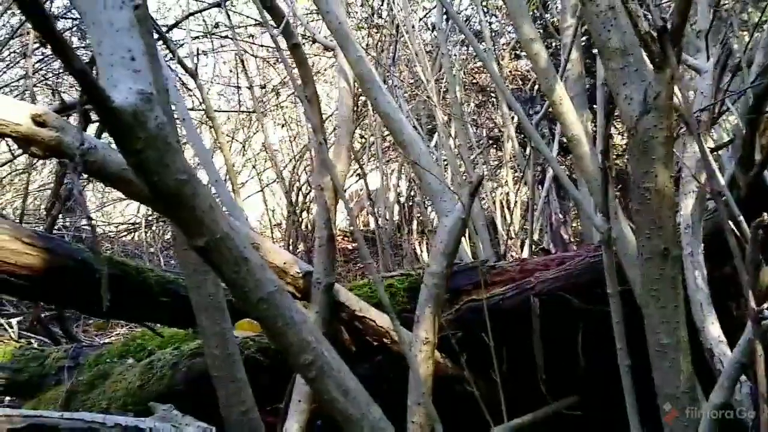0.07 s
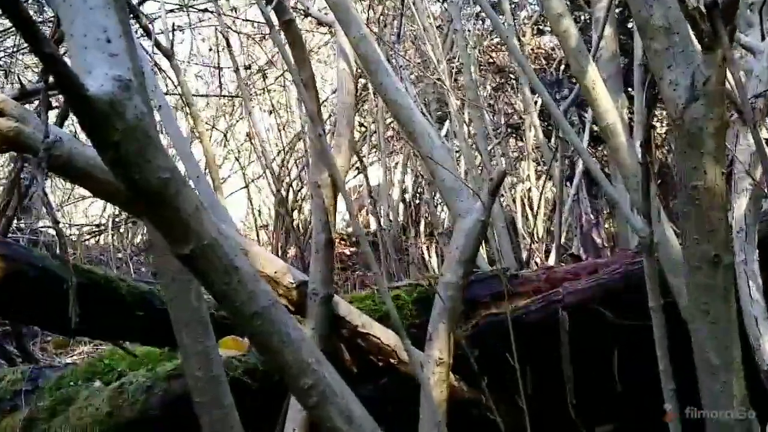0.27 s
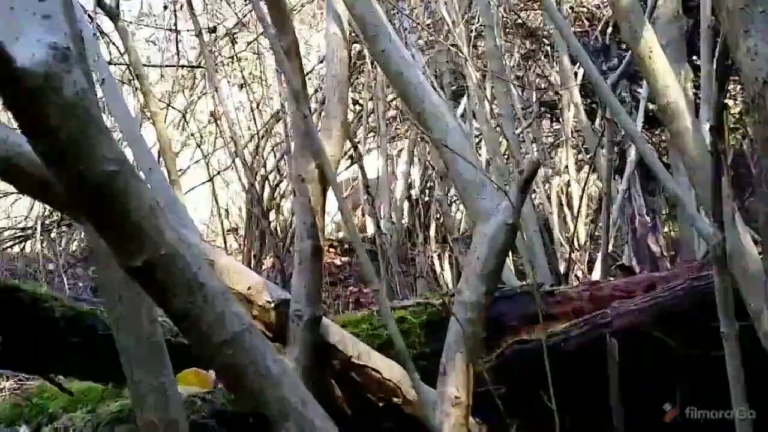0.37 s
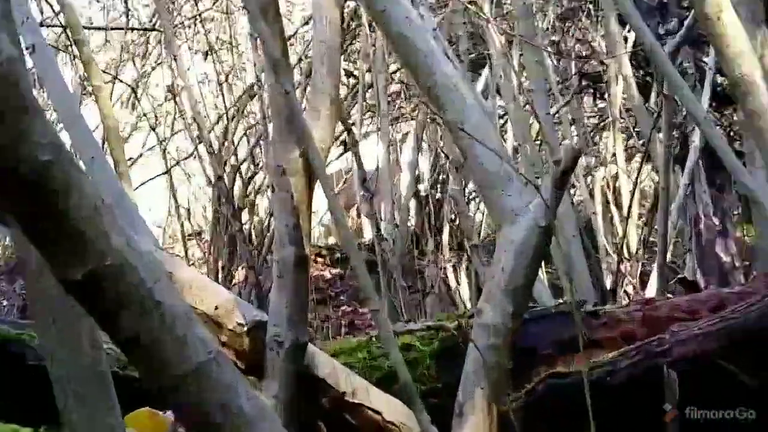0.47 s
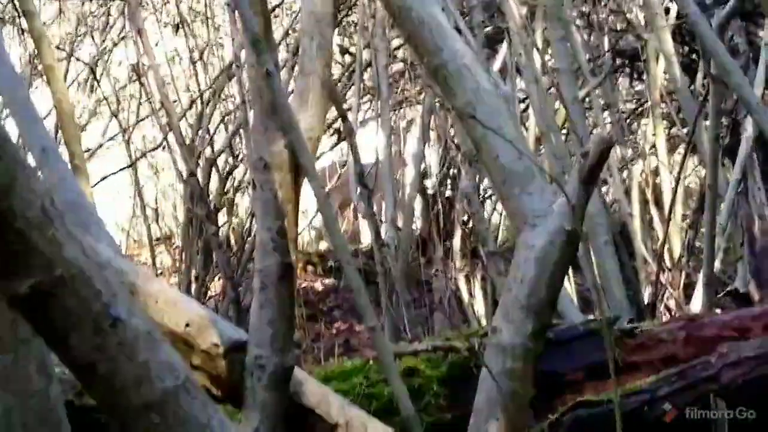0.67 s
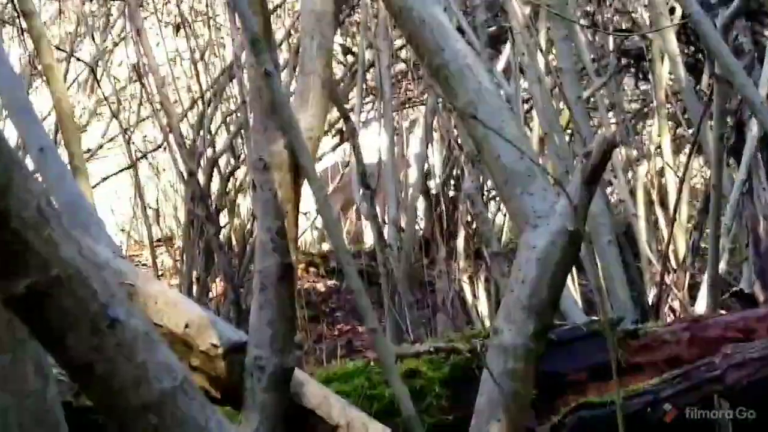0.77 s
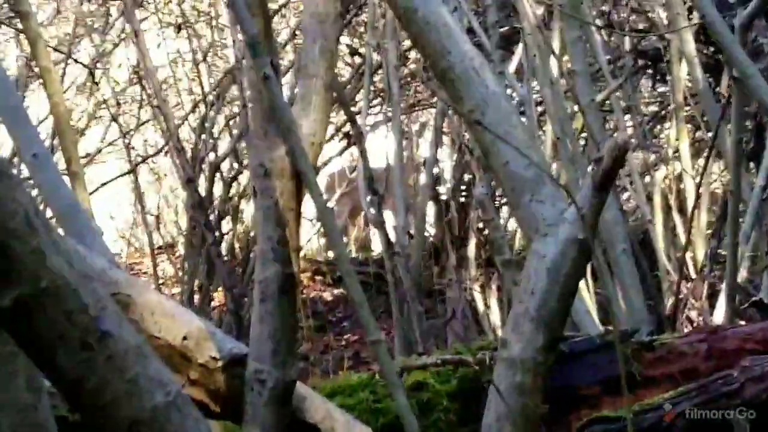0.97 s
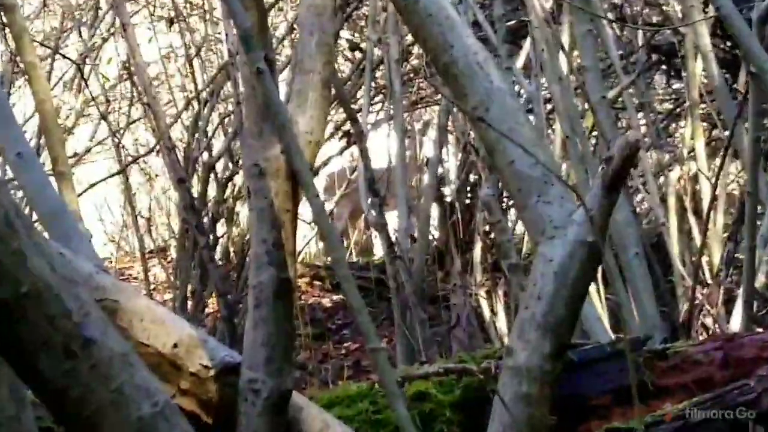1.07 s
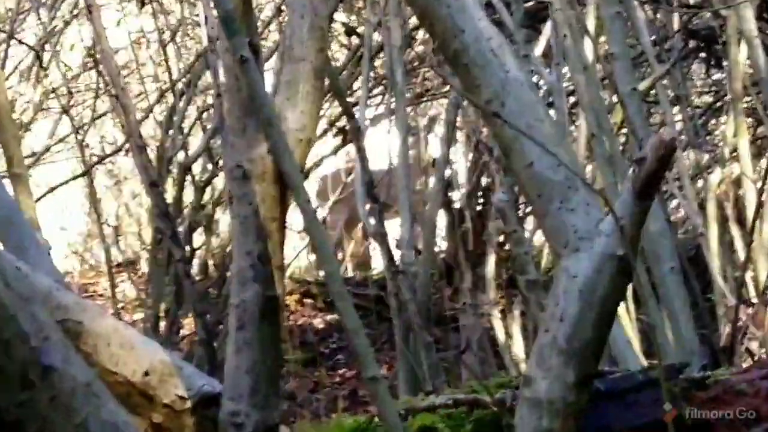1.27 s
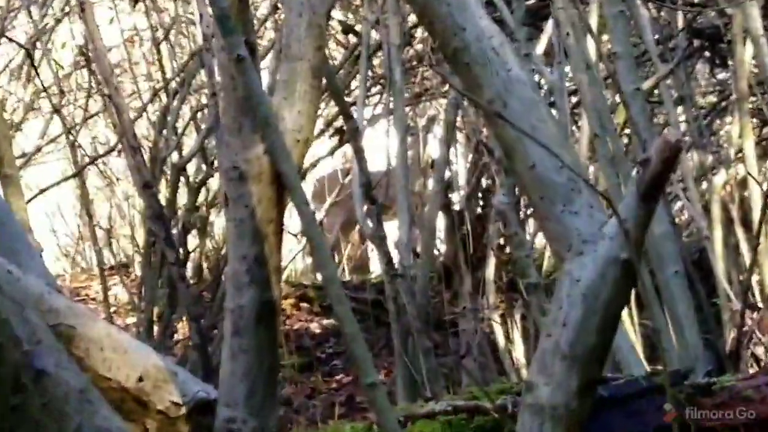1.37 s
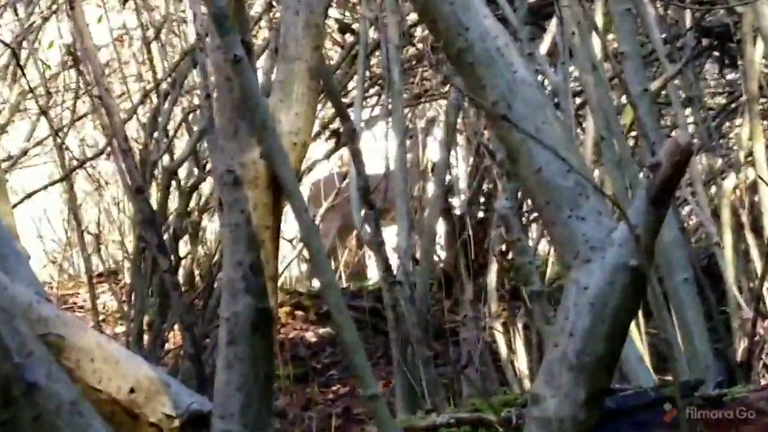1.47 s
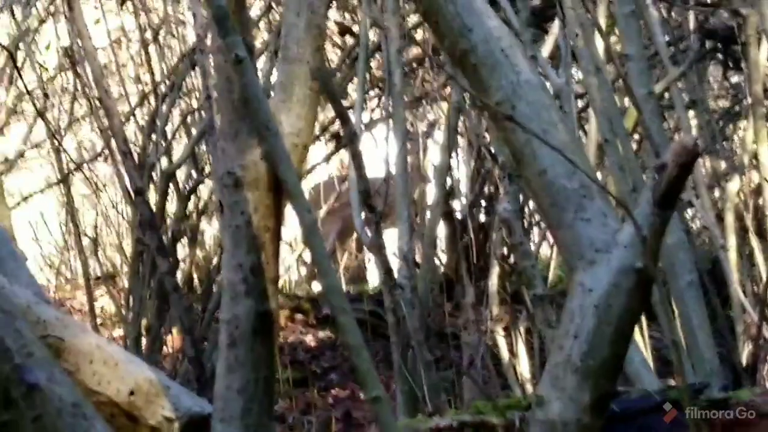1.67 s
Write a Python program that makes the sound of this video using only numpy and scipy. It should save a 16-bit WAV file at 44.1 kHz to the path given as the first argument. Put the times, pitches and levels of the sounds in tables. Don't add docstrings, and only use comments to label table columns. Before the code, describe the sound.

Dry debris snaps and crunches close on the right after a bright leaf rustle, in quiet woods

```python
import sys
import numpy as np
from scipy import signal
from scipy.fft import rfft, irfft
from scipy.io import wavfile
from scipy.ndimage import uniform_filter1d

SR = 44100
rng = np.random.default_rng(int(sys.argv[2]) if len(sys.argv) > 2 else 0)


def to_wav(sig):
    pcm = np.clip(np.atleast_2d(sig), -1, 1) * 32767
    pcm = np.round(pcm).astype(np.int16)
    wavfile.write(sys.argv[1], SR, pcm.T)


def voltage_ratio(level):
    return 10 ** (np.asarray(level, float) / 20)


N = 77175
CUT_S, BACK_S = 0.5116, 0.569


def read(points, hz):
    f, value = np.transpose(points)
    return np.interp(np.log(hz + 1), np.log(f + 1), value)


def curve(table, column):
    rows = np.array(table)
    return np.interp(np.arange(N) / SR, rows[:, 0], rows[:, column])


def evened(x):
    return x / np.sqrt(np.mean(x ** 2) + 1e-20)


def add(mix, start_s, sound):
    part = mix[..., round(start_s * SR):][..., :sound.shape[-1]]
    part += sound[..., :part.shape[-1]]


def colour(x, points, tilt_db=0):
    size = x.shape[-1]
    hz = np.fft.rfftfreq(size, 1 / SR)
    gain_db = read(points, hz) + tilt_db * np.log10((hz + 50) / 1000)
    return evened(irfft(rfft(x) * voltage_ratio(gain_db), size))


def resonate(x, hz, width_hz):
    carrier = np.exp(2j * np.pi * np.cumsum(hz * np.ones(len(x))) / SR)
    pole = np.exp(-np.pi * width_hz / SR)
    slow = signal.lfilter([1], [1, -2 * pole, pole * pole], x / carrier)
    return evened((carrier * slow).real)


def gritty(size, spread_db=2.0):
    grains_per_s, bed_gain = 9000, 0.7
    hit = rng.random(size) < grains_per_s / SR
    strength = voltage_ratio(spread_db * np.minimum(rng.exponential(1, size), 3))
    grains = evened(hit * strength * rng.standard_normal(size))
    return grains + bed_gain * rng.standard_normal(size)


def patchy(x, depth_db):
    z = signal.stft(x, nperseg=256)[2]
    field = rng.standard_normal(z.shape[1:])
    field = uniform_filter1d(field, size=6, axis=0)
    field = evened(uniform_filter1d(field, size=4, axis=1))
    patched = signal.istft(z * voltage_ratio(depth_db * field), nperseg=256)[1]
    return evened(patched[:, :x.shape[-1]])


# (frequency [Hz], density [dB per Hz])
AIR_SPECTRUM = [(150, -30), (250, -2.5), (512, -23.5), (804, -25.5), (1240, -26.5), (4200, -30),
                (13500, -37)]


def air():
    level_db = -74.5
    return voltage_ratio(level_db) * np.array([colour(x, AIR_SPECTRUM) for x in rng.standard_normal((2, N))])


# (time [s], level [dB rms], share in the hum [0-1])
RUMBLE = [(0, -69, 0.12), (.5, -61.5, 0.094), (.66, -61.5, 0.39), (.81, -52.5, 0.68), (.85, -40, 0.81),
          (.9, -34.5, 0.94), (.94, -39, 0.95), (.965, -50.5, 0.7), (1.0, -39, 1), (1.06, -49.5, 0.33),
          (1.3, -50.5, 0.11), (1.75, -54, 0.095)]
# (frequency [Hz], width [Hz], level [dB])
BOOM = [(77.6, 57, -3.5), (108.6, 47, 3.5), (149, 28.4, -3), (237, 15, -14)]


def rumble():
    hum_hz, hum_width_hz = 101, 16
    noise = rng.standard_normal((3, N))
    booms = [evened(sum(voltage_ratio(db) * resonate(x, hz, width_hz) for hz, width_hz, db in BOOM))
             for x in noise[:2]]
    hum = np.sin(2 * np.pi * hum_hz * np.arange(N) / SR)
    hum = evened(hum + 0.82 * resonate(noise[2], hum_hz, hum_width_hz))
    share = np.clip(curve(RUMBLE, 2), 0, 1)
    mono = np.sqrt(share) * hum + np.sqrt(1 - share) * booms[0]
    return voltage_ratio(curve(RUMBLE, 1)) * np.array([mono + 0.047 * booms[1], mono - 0.45 * booms[1]])


# (time [s], top line [Hz], level [dB rms])
WHISTLE = [(.68, 12250, -90), (.70, 12450, -73), (.73, 12950, -72), (.80, 12800, -80), (.84, 13100, -85),
           (.86, 13050, -66), (.92, 13050, -64), (.945, 12800, -62), (.97, 12400, -62), (1.035, 12350, -64),
           (1.07, 12600, -61), (1.14, 12450, -65), (1.2, 12450, -92)]
# (shift [Hz], width [Hz], level [dB])
WHISTLE_LINES = [(2, 95, 0), (-3880, 180, -7.5), (-7750, 220, -12), (-10500, 300, -7)]


def whistle():
    air_db, right_db = 0.5, -21
    top_hz, t = curve(WHISTLE, 1), np.arange(N) / SR
    lines = sum(voltage_ratio(db) * resonate(rng.standard_normal(N), top_hz + shift_hz, width_hz)
                for shift_hz, width_hz, db in WHISTLE_LINES)
    breath = voltage_ratio(air_db) * colour(rng.standard_normal(N), AIR_SPECTRUM, -10)
    active = (t > WHISTLE[0][0]) * (t < WHISTLE[-1][0])
    return voltage_ratio(curve(WHISTLE, 2)) * active * (lines + breath) * voltage_ratio(np.array([[0], [right_db]]))


# (frequency [Hz], density [dB per Hz])
LEAF_SPECTRUM = [(100, -6), (500, -17), (1250, -18.5), (2200, -12), (5000, -14.5), (11500, -12),
                 (13500, -12)]
# (time [s], left level [dB rms])
RUSTLE = [(0, -61.5), (.085, -58.5), (.11, -47.5), (.17, -49), (.215, -38), (.24, -37.5), (.247, -45),
          (.27, -50), (.283, -43), (.30, -35), (.345, -44.5), (.40, -57.5), (.455, -46.5), (.485, -53.5),
          (.515, -60.5)]
# (frequency [Hz], width [Hz], level [dB])
LEAF_BANDS = [(11100, 900, -15), (12390, 800, -13)]


def rustle():
    right_db, shared, bands_full_db = -4.5, 0.1, -38.5
    left, other = patchy(gritty((2, N), 2.5), 4.2)
    right = shared * left + (1 - shared) * other
    level_db = curve(RUSTLE, 1)
    bands = sum(voltage_ratio(db) * resonate(left, hz, width_hz) for hz, width_hz, db in LEAF_BANDS)
    pair = np.array([colour(left, LEAF_SPECTRUM) + bands * voltage_ratio(level_db - bands_full_db),
                     voltage_ratio(right_db) * colour(right, LEAF_SPECTRUM, -3.0)])
    flicker_db = 2.6 * evened(uniform_filter1d(rng.standard_normal(N), 300))
    mute_db = -99 * (np.arange(N) > BACK_S * SR)
    return pair * voltage_ratio(level_db + flicker_db + mute_db)


# (time [s], t60 [s], level [dB rms], brightness [dB per decade], right re left [dB])
CRACKLES = [
    (.031, 0.075, -36, 15.5, -8.5),
    (.043, 0.06, -28, 14, -16),
    (0.0958, 0.045, -25, 0.5, -7),
    (.2445, 0.011, -56, -12.5, -22.5),
    (0.288, 0.048, -36, 4, -2.5),
    (0.419, 0.16, -46.5, -3.5, 7),
]


def crackles():
    out, t = np.zeros((2, N)), np.arange(4096) / SR
    for s, t60_s, db, tilt_db, right_db in CRACKLES:
        grit = patchy(gritty((2, 4096), 5.2), 1.0)
        left = colour(grit[0], LEAF_SPECTRUM, tilt_db)
        right = voltage_ratio(right_db) * colour(grit[0] + 1.4 * grit[1], LEAF_SPECTRUM, tilt_db - 9.0)
        envelope = np.clip(t / 0.0014, 0, 1) * voltage_ratio(db - 60 * t / t60_s)
        add(out, s, np.array([left, right]) * envelope)
    return out


def leaves():
    right_dull_hz = 9000
    left, right = rustle() + crackles()
    return np.array([left, signal.lfilter(*signal.butter(6, right_dull_hz, fs=SR), right)])


# (time [s], frequency [Hz], t60 [s], left level [dB], right level [dB])
RINGS = [(.0965, 1605, .0067, -21.5, -43), (.2375, 2380, .007, -42, -21), (.2443, 1440, .009, -31, -17),
         (.2446, 2820, .006, -32, -21), (.289, 11100, .06, -35, -60), (.294, 12500, .04, -37, -55),
         (.2952, 808, .011, -20, -16), (.296, 4540, .03, -38, -30), (.2962, 5700, .012, -38, -25),
         (.3215, 5210, .012, -39, -34), (1.077, 2900, .015, -43, -38), (1.0925, 8810, .015, -60, -30),
         (1.093, 3000, .018, -33, -32), (1.2075, 2400, .014, -70, -26), (1.3285, 2680, .025, -53, -27),
         (1.3305, 3700, .008, -60, -31), (1.3305, 5410, .01, -60, -30), (1.3305, 7550, .007, -60, -33),
         (1.3305, 10800, .006, -60, -31), (1.668, 750, .02, -70, -49), (1.6685, 3930, .005, -66, -39)]


def rings():
    out, t = np.zeros((2, N)), np.arange(2000) / SR
    for s, hz, t60_s, left_db, right_db in RINGS:
        ring = np.sin(2 * np.pi * hz * t)
        ring += 0.35 * np.sin(2 * np.pi * 1.08 * hz * t + 6 * rng.random())
        decay = voltage_ratio(np.array([[left_db], [right_db]]) - 60 * t / t60_s)
        add(out, s, decay * np.clip(t / 0.0009, 0, 1) * ring)
    return out


# (time [s], peak [dB], brightness [dB per decade], left re right [dB])
TICKS = [(0.2444, -29, -15, -8), (0.2982, -28, -4, -3), (0.328, -19, -19, -18), (.41, -44, 0, -10),
         (.45, -33, -12, -3), (.640, -39, -14, -28), (0.81, -42, -3, -28), (.8337, -47, -25, -23),
         (.8573, -28, -2, -25), (.9026, -29, -13, -22), (.9815, -30, 15, -34), (1.0686, -25, -4, -34),
         (1.0719, -9, -12, -40), (1.0736, -35, -6, -37), (1.0843, -32, 3, -30), (1.0926, -24, 2, -40),
         (1.0957, -22, 0, -40), (1.098, -27, -4, -44), (1.1307, -40, 0, -20), (1.1684, -42, 3, -12),
         (1.2082, -22.5, 8, -43), (1.2257, -16, -12, -39), (1.228, -38, -2, -35), (1.238, -43, -5, -35),
         (1.3315, -9, 8, -45), (1.3525, -11, 19, -39), (1.3728, -29.5, 6, -25), (1.4797, -12.5, 22, -40),
         (1.6707, -46.5, 4, -21)]


def ticks():
    scatter, scatter_s = 0.12, 0.0004
    out, t = np.zeros((2, N)), np.arange(-256, 256) / SR
    for s, db, tilt_db, left_db in TICKS:
        spike = (t == 0) + scatter * rng.standard_normal(len(t)) * np.exp(-np.abs(t) / scatter_s)
        spike = colour(spike, [(200, -21), (1200, 2.5), (16000, -11)], tilt_db) * np.hanning(len(t))
        add(out, s + t[0], voltage_ratio(db + np.array([[left_db], [0]])) * spike / np.abs(spike).max())
    return out


# (frequency [Hz], density [dB per Hz])
GRIT_SPECTRUM = [(50, -4.5), (130, 2), (630, -1), (1700, -3), (2500, -9), (8500, -19.5), (13500, -28)]
# (time [s], length [s], level [dB rms], brightness [dB per decade])
SCRAPES = [(0.234, 0.014, -23, -7), (0.32, 0.011, -32.5, -5.5), (0.334, 0.064, -37, -2.5),
           (0.403, 0.027, -48, -14.5), (0.437, 0.048, -46, -0.5), (0.482, 0.073, -54.5, -4.5),
           (0.57, 0.049, -35.5, 2), (0.611, 0.059, -62.5, 0.5), (0.862, 0.051, -43.5, -6),
           (0.947, 0.019, -42, -8.5), (0.968, 0.034, -33, -2.5), (1.067, 0.0084, -31, -3),
           (1.077, 0.018, -26.5, -3), (1.091, 0.011, -26, 9), (1.099, .01, -33.5, -5),
           (1.117, 0.0061, -33, -14), (1.2066, 0.0048, -34, 4.5), (1.211, 0.0065, -43, -17),
           (1.22, 0.025, -31, -13), (1.327, 0.026, -34.5, -8), (1.348, 0.019, -33.5, 1),
           (1.482, .1, -70.5, 7), (1.672, 0.019, -75.5, 8)]


def scrapes():
    out, t = np.zeros(N), np.arange(4096) / SR
    for s, length_s, db, tilt_db in SCRAPES:
        noise = colour(patchy(gritty((1, 4096)), 2.2)[0], GRIT_SPECTRUM, tilt_db)
        lumps = voltage_ratio(2.4 * evened(uniform_filter1d(rng.standard_normal(4096), 130)))
        shape = np.abs(np.sin(np.pi * np.clip(t / length_s, 0, 1) ** 0.59)) ** 0.74
        add(out, s, voltage_ratio(db) * evened((shape * lumps * noise)[t < length_s]))
    return out


# (time [s], peak [dB], width [ms])
PUSHES = [(.2384, 0, .2), (.2393, -10, .25), (.2402, -8, .25), (.2451, -1.5, .18), (.3265, -17, .13),
          (.338, -26, 1.2), (.594, -21, .12), (.640, -32, .2), (.761, -35, .35), (.811, -22, .2),
          (.8337, -20, .18), (.8527, -23, .25), (.9026, -31, .1), (.9392, -25, .2), (.9506, -26, .22),
          (1.0953, -14, .12), (1.1214, -15, .16), (1.208, -19, .25), (1.2315, -8, .22), (1.4799, -18, .2)]
# (time [s], peak [dB], width [ms])
PULLS = [(.242, -14, 1.1), (.2457, -7, .18), (.2802, -13, 1.2), (.4225, -27, 2.0), (.4395, -22, 1.4),
         (.832, -25, .35), (.8573, -19, .25), (.8709, -28, .45), (.9568, -22, .3), (.9709, -24, .12),
         (.9815, -16, .12), (.990, -21, .9), (1.0707, -11, .22), (1.0717, -5, .26), (1.0743, -10, .12),
         (1.0921, -9, .13), (1.2246, -7.5, .22), (1.3032, -39, .18), (1.3318, -5, .22), (1.3526, -15, .45),
         (1.4173, -36, .16), (1.4783, -31, .6), (1.6701, -50, .3)]


def snaps():
    highpass_hz, puff_db, puff_rise_s, puff_fall_s, puff_width_ms = 100, -16, 0.0008, 0.0019, 0.23
    out, t = np.zeros(N), np.arange(-300, 500) / SR
    puff_envelope = np.exp(-np.abs(t) / np.where(t > 0, puff_fall_s, puff_rise_s))
    for gain, table in ((1, PUSHES), (-1.363, PULLS)):
        for s, db, width_ms in table:
            pulse = gain * np.exp(-(np.abs(t) / (width_ms / 1000)) ** 1.43)
            puff = colour(rng.standard_normal(len(t)), GRIT_SPECTRUM, 0.84) * puff_envelope
            puff *= voltage_ratio(puff_db) / (1 + (width_ms / puff_width_ms) ** 3)
            add(out, s + t[0], voltage_ratio(db) * (pulse + puff))
    return signal.sosfilt(signal.butter(1, highpass_hz, "high", fs=SR, output="sos"), out)


def with_tail(near):
    level_db, t60_s, lowpass_hz = -33, 0.6, 3470
    size = SR // 2
    tail = signal.lfilter(*signal.butter(1, lowpass_hz, fs=SR), rng.standard_normal(size))
    tail *= voltage_ratio(-60 * np.arange(size) / SR / t60_s)
    return near + voltage_ratio(level_db) * signal.fftconvolve(near, tail / np.linalg.norm(tail))[:N]


def leak_to_left(near):
    early_db, late_db, delay_s, lowpass_hz = -24, -37, 0.0012, 600
    dull = signal.lfilter(*signal.butter(1, lowpass_hz, fs=SR), near)
    level_db = np.where(np.arange(N) / SR < BACK_S, early_db, late_db)
    return np.roll(dull, round(delay_s * SR)) * voltage_ratio(level_db)


def scene():
    near = with_tail(snaps() + scrapes())
    debris = np.array([leak_to_left(near), near])
    return air() + rumble() + whistle() + leaves() + rings() + ticks() + debris


def low_pass(x):
    return signal.sosfilt(signal.butter(12, 14700, fs=SR, output="sos"), x)


def record(dry):
    cut_db_per_s, return_s, edge_hz, edge_leak_db = -2500, 0.0015, 13030, -45
    t = np.arange(N) / SR
    fade_out = voltage_ratio(cut_db_per_s * np.clip(t - CUT_S, 0, 1))
    fade_in = np.clip((t - BACK_S) / return_s, 0, 1)
    gate = np.where(t < BACK_S, fade_out, fade_in)
    x = signal.sosfiltfilt(signal.butter(2, 50, "high", fs=SR, output="sos"), dry) * gate
    x = x / (1 + (np.abs(x) / 0.9) ** 4) ** 0.25
    lowpass = signal.firwin(201, edge_hz, window=("kaiser", 5), fs=SR)
    padded = np.pad(x, ((0, 0), (100, 100)), "reflect")
    limited = signal.oaconvolve(padded, lowpass[None], "valid")
    return low_pass(voltage_ratio(edge_leak_db) * x + limited)


dry = scene()
out = record(dry)
to_wav(out)
```